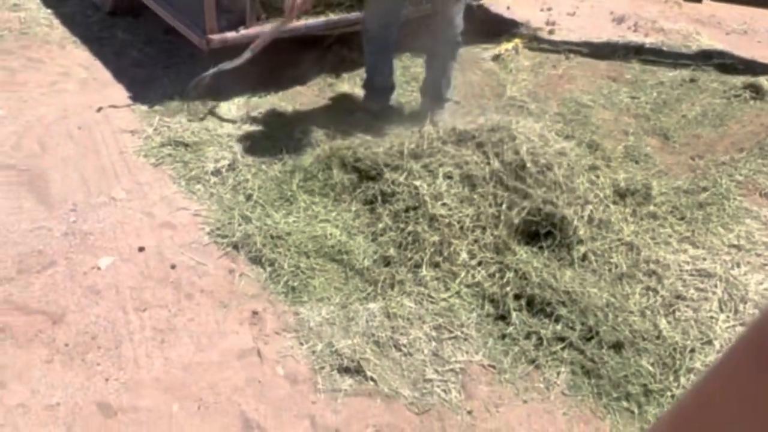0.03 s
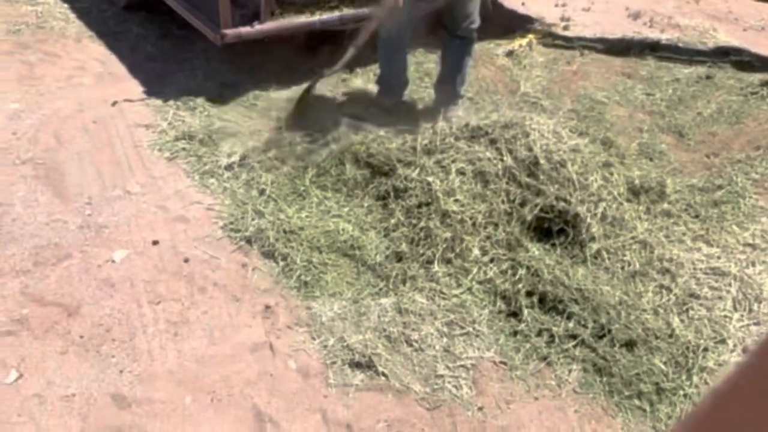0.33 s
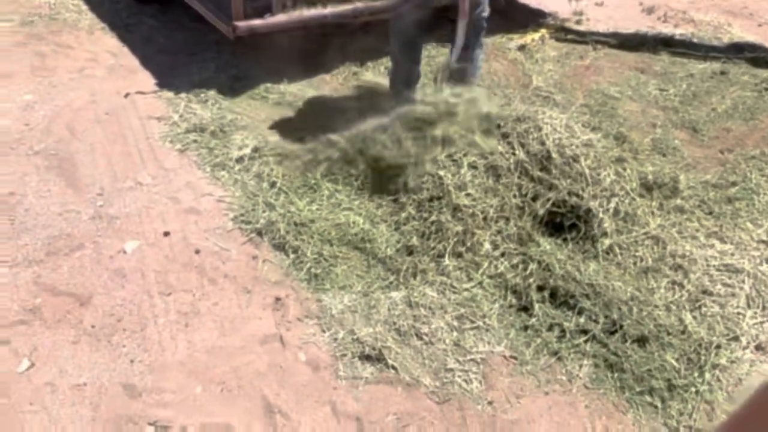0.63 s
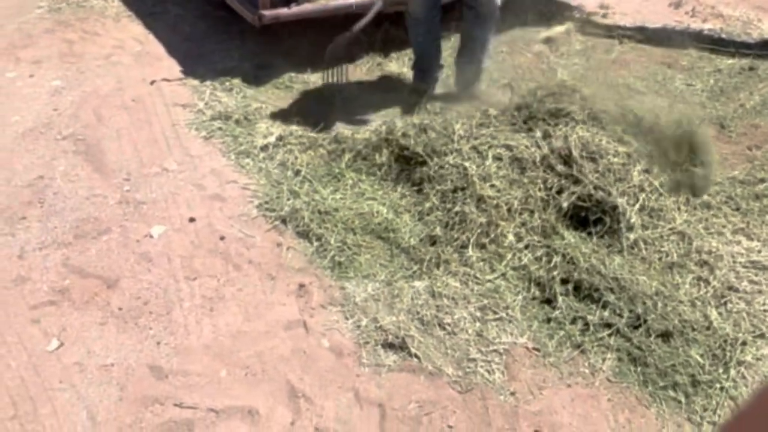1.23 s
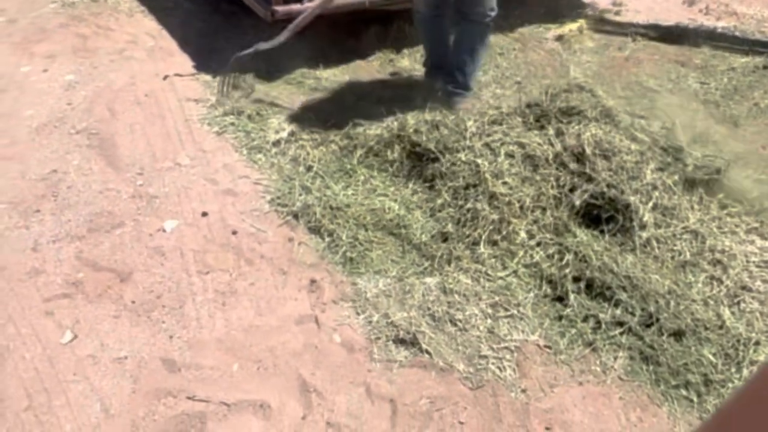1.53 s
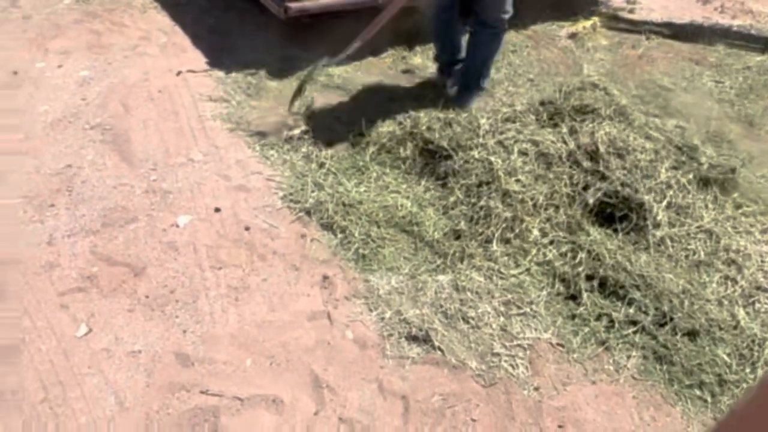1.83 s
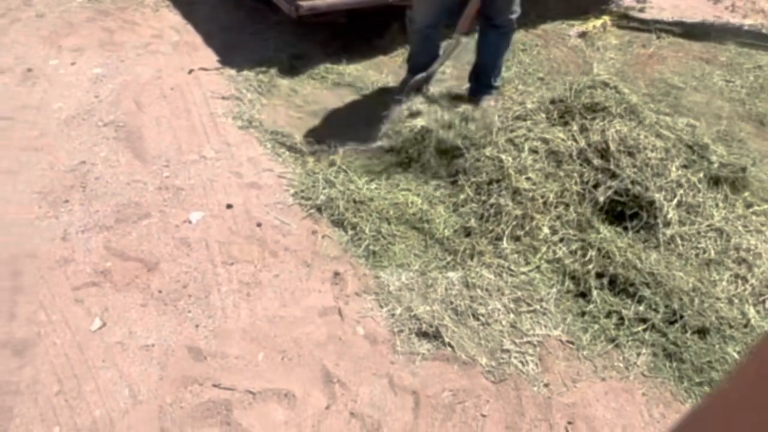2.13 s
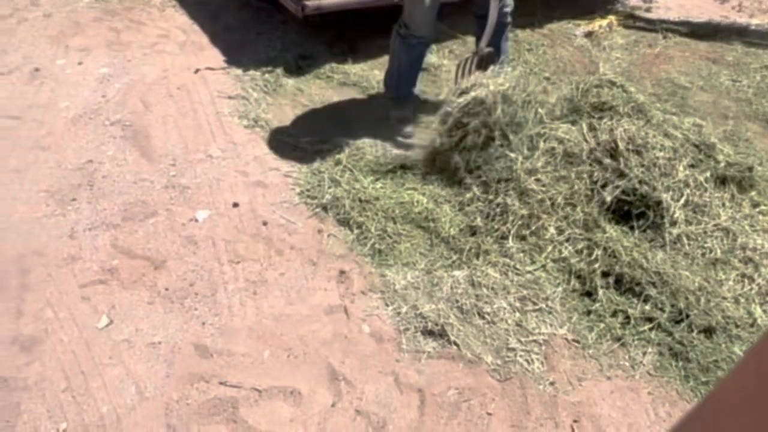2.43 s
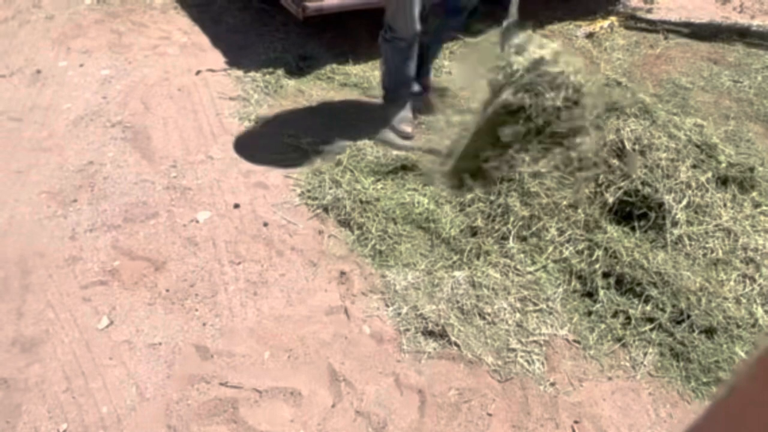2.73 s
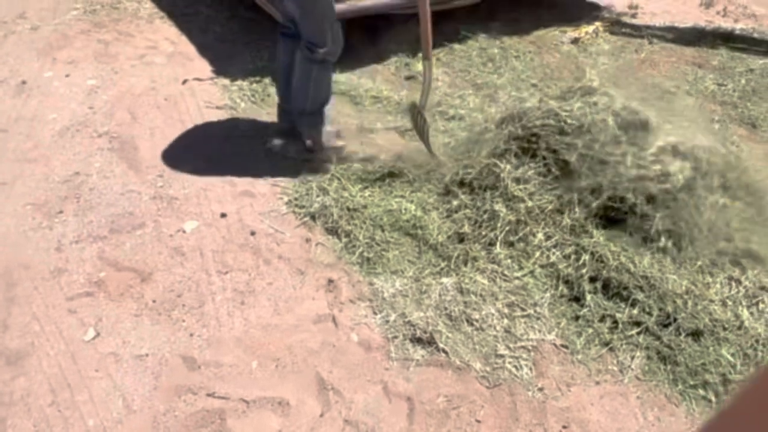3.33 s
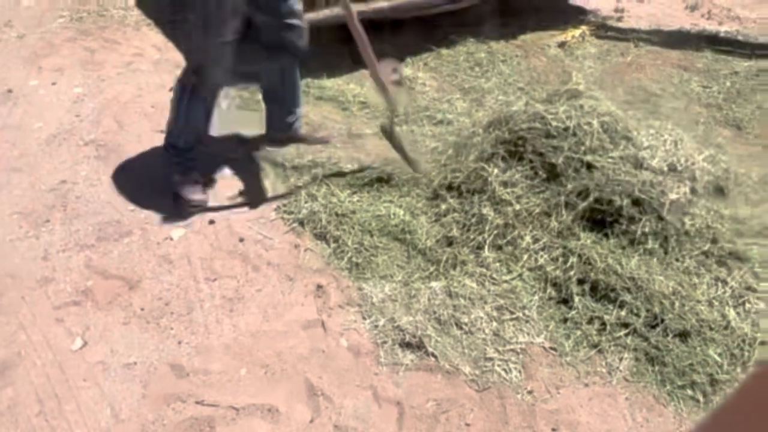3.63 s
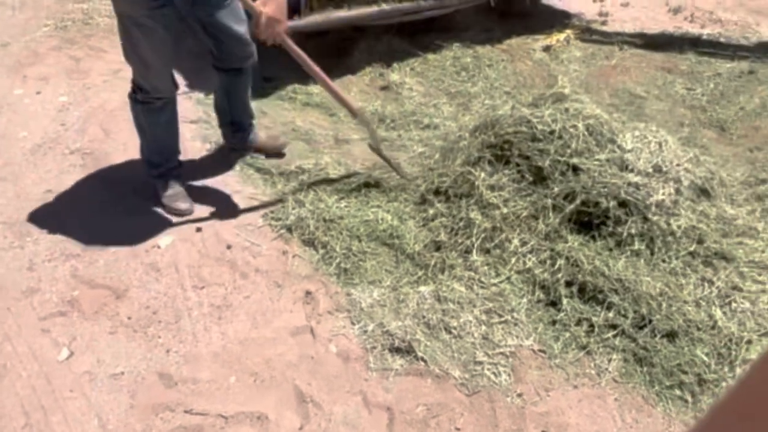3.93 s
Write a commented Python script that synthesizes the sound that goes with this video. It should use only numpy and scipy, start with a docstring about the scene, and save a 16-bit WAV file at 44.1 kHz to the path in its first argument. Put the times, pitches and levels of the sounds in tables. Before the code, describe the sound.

A pitchfork scrapes over hard dirt with ringing clinks at the start, then dry hay rustles as it is lifted and tossed until about 1.2 seconds. The tines grate and clink again from 1.5 to 2.1 seconds. More hay crackles and swishes, landing softly with a clink near 3.2 seconds. Faint boot scuffs, a heel knock and a light scrape follow. Light wind buffets the microphone throughout.

```python
"""Clinks, grating and dry rustle: a pitchfork is pushed twice over hard dirt into loose hay,
and each forkful is lifted and tossed on a pile. Grit cracks under the steel tines and rings them;
countless stalks snap and slide, and the hay lands softly. Boots crush dirt and a heel knocks.
Light wind rumbles and buffets at the two ports of the microphone."""
import sys
import numpy as np
from scipy import signal
from scipy.fft import rfft, irfft
from scipy.io import wavfile

SR = 44100
rng = np.random.default_rng(int(sys.argv[2]) if len(sys.argv) > 2 else 0)


def wrap_up_sound(samples):
    """Save the sound to the file named by the first command line argument, as 16-bit audio."""
    columns = np.atleast_2d(samples).T
    # keep every value between -1 and 1, then stretch to whole-number steps
    tamed = np.clip(columns, -1, 1)
    steps = np.round(tamed * 32767).astype(np.int16)
    wavfile.write(sys.argv[1], SR, steps)


N = 176400
T = np.arange(N) / SR
HZ = np.fft.rfftfreq(2 * N, 1 / SR)
GUST_RATE_HZ, HAY_APART = 22, 0.69
# Steady breeze. Each row: time in seconds, level in dB.
BREEZE_LEVELS = [(.1, -47.5), (.7, -49), (.92, -45), (1.15, -45), (1.25, -56), (1.5, -51.5), (2.25, -54.5),
                 (2.7, -54), (2.85, -48), (3.15, -54), (3.9, -59)]


def amp(db):
    """Decibels to gain."""
    return 10 ** (np.asarray(db) / 20)


def unit(x):
    """Scale to an rms of one."""
    return x / np.sqrt(np.mean(x ** 2) + 1e-20)


def spectrum(points):
    """Interpolate (Hz, value) rows over log frequency."""
    hz, value = np.transpose(points)
    return np.interp(np.log(HZ + 1), np.log(hz), value)


def filtered(x, response):
    """Apply a frequency response."""
    return irfft(rfft(x, 2 * N) * response)[..., :N]


def add(mix, start_s, sound):
    """Mix a sound in at start_s."""
    part = mix[:, max(round(start_s * SR), 0):][:, :sound.shape[1]]
    part += sound[:, :part.shape[1]]


def pair(three, apart):
    """Stereo from one shared signal plus one per side, weighted by apart."""
    return (three[0] + apart * three[1:]) / np.sqrt(1 + apart ** 2)


def wander(rate_hz):
    """Low-passed noise, rms one."""
    return unit(filtered(rng.standard_normal(N), np.exp(-(HZ / rate_hz) ** 2)))


def grains(per_s, spread_db, apart):
    """Stereo train of tiny fractures: many weak, a few strong."""
    strength = amp(spread_db * np.minimum(rng.exponential(1, (3, N)), 5))
    sign = rng.choice([-1., 1.], (3, N))
    fires = rng.random((3, N)) < per_s / SR
    return unit(pair(strength * sign * fires, apart))


def stroke(t, attack_s, hold_s, release_s):
    """Linear rise, hold, exponential fall."""
    return np.clip(t / attack_s, 0, 1) * np.exp(-np.maximum(t - attack_s - hold_s, 0) / release_s)


def scatter(decay_s, size):
    """Spectrum of a short random ring, mean power one."""
    ring = rng.standard_normal(size) * np.exp(-T[:size] / decay_s)
    return rfft(ring / np.linalg.norm(ring))


def yard(x, level_db=-16, t60_s=0.055, taps_per_s=2000):
    """Add brief scatter from the ground and a nearby trailer."""
    t = T[:SR // 3]
    taps = rng.standard_normal((2, len(t))) * (rng.random((2, len(t))) < taps_per_s / SR)
    taps *= amp(-60 * t / t60_s)
    taps /= np.linalg.norm(taps, axis=1, keepdims=True)
    return x + amp(level_db) * signal.fftconvolve(x, taps, axes=1)[:, :N]


def wind(gust_db=1.5, air_db=-64.5):
    """Lumpy rumble on the microphone over quiet open air."""
    # Rumble and air spectra. Each row: frequency in Hz, gain in dB.
    rumble_colour = [(25, -39), (50, 1), (70, 4.5), (110, -4), (170, -23.5), (450, -31), (700, -65),
                     (2000, -39)]
    air_colour = [(280, 8.5), (450, 8.5), (800, -17), (1300, -4), (3000, -7), (8000, -4), (16000, -76)]
    rumble = filtered(pair(rng.standard_normal((3, N)), apart=0.45), amp(spectrum(rumble_colour)))
    rumble = unit(rumble * amp(gust_db * wander(GUST_RATE_HZ)))
    air = unit(filtered(pair(rng.standard_normal((3, N)), apart=0.5), amp(spectrum(air_colour))))
    return rumble * amp(np.interp(T, *np.transpose(BREEZE_LEVELS))) + amp(air_db) * air


def buffets():
    """Eddies hit the ports as ragged pressure pulses, bass last; small puffs follow the breeze."""
    # Eddies. Each row: time in seconds, peak in dB, upper edge in Hz.
    eddies = [(0.106, -39.5, 251), (0.191, -40, 380), (0.34, -27, 230), (0.415, -37.5, 422),
              (0.539, -36.5, 145), (.744, -32, 190), (0.765, -28.5, 195), (0.856, -37, 390),
              (0.882, -29.5, 115), (0.911, -35.5, 254), (1.05, -29, 305), (1.143, -28.5, 142),
              (1.258, -33, 276), (1.318, -34.5, 131), (1.413, -34.5, 298), (1.441, -35, 143),
              (1.61, -40, 334), (1.79, -35, 230), (2.289, -43, 270), (2.359, -39, 260), (2.385, -36.5, 322),
              (2.452, -34.5, 302), (2.552, -40, 400), (2.613, -48, 650), (2.639, -42.5, 460),
              (2.683, -44.5, 217.4), (2.72, -43.5, 460), (2.838, -44.5, 280), (2.92, -45, 300),
              (3.019, -45, 378), (3.971, -27, 210), (3.985, -27.5, 117)]
    puffs_per_s, puff_over_breeze_db, puff_edge_hz = 14, 3.5, 330
    low_cut_hz, slope, delay_cycles, apart_rad, roughness = 44, 0.62, 1.096, 0.63, 0.45
    size = 8192
    hz, out = np.fft.rfftfreq(size, 1 / SR) + 1, np.zeros((2, N))
    puff_s = T[rng.random(N) < puffs_per_s / SR]
    puff_db = np.interp(puff_s, *np.transpose(BREEZE_LEVELS)) + puff_over_breeze_db
    puffs = [(s, db, puff_edge_hz) for s, db in zip(puff_s, puff_db)]
    for start_s, peak_db, edge_hz in eddies + puffs:
        band = hz ** -slope / np.sqrt((1 + (low_cut_hz / hz) ** 8) * (1 + (hz / edge_hz) ** 7))
        phase = rng.uniform(0, 2 * np.pi) + apart_rad * rng.standard_normal((2, 1))
        lag = delay_cycles * rng.uniform(0.6, 1.3) * np.log(hz)  # group delay goes as 1 / hz
        ragged = 1 + roughness * scatter(decay_s=0.006, size=size)
        pulse = irfft(band * np.exp(1j * (phase - 2 * np.pi * lag)) * ragged)
        add(out, start_s, amp(peak_db) * pulse / abs(pulse).max())
    return out


def scuffs():
    """Dirt crushes softly under boots, without ringing."""
    # Steps. Each row: start, attack, hold and release in seconds, level in dB.
    steps = [(.17, 0.047, 0.013, 0.018, -47), (3.248, 0.00086, 0.0025, 0.0097, -47.5),
             (3.32, 0.0022, 0.0029, 0.0085, -52.5), (3.378, 0.0018, 0.0016, 0.0051, -52),
             (3.416, 0.004, 0.0023, 0.0084, -58.5), (3.578, 0.016, 0.012, 0.026, -49.5)]
    # Crunch spectrum. Each row: frequency in Hz, gain in dB.
    dirt_colour = [(100, -11), (380, 4), (660, -5.5), (900, -8), (1250, -7), (2500, -13), (4000, -15),
                   (7000, -10.5), (14000, -31)]
    weight = sum(amp(db) * stroke(T - s, attack, hold, release) for s, attack, hold, release, db in steps)
    dirt = grains(per_s=3000, spread_db=3.5, apart=0.6)
    return weight * unit(filtered(dirt, amp(spectrum(dirt_colour))))


def heel():
    """A boot heel lands and rocks on hard ground with a short hollow ring."""
    # Knocks. Each row: time in seconds, gain in dB.
    knocks = [(3.597, -48), (3.619, -45)]
    # Heel modes. Each row: frequency in Hz, T60 in seconds, relative level in dB.
    modes = [(635, .04, 3), (1164, 0.032, -8)]
    ring = sum(amp(db - 60 * T / t60_s) * np.sin(2 * np.pi * hz * T) for hz, t60_s, db in modes)
    out = np.zeros((2, N))
    for start_s, db in knocks:
        add(out, start_s, amp(db) * ring[None])
    return out


def swishes(relative_width=1.3, flutter_db=2):
    """A forkful sweeps through hay or slides down the pile: crackle in a broad gliding resonance."""
    # Each row: start, attack, hold and release in seconds, level in dB, first and last centre in Hz.
    sweeps = [(.42, .1, 0.12, 0.093, -62, 3260, 2070), (2.27, 0.18, 0.29, 0.044, -58, 5200, 2200),
              (2.83, .14, 0.061, .025, -57.5, 726, 1110), (3.22, 0.012, 0.063, 0.29, -66, 1100, 820)]
    out = np.zeros((2, N))
    for start_s, attack_s, hold_s, release_s, db, from_hz, to_hz in sweeps:
        centre_hz = np.interp(T, [start_s, start_s + attack_s + hold_s], [from_hz, to_hz])
        carrier = np.exp(2j * np.pi * np.cumsum(centre_hz) / SR)
        pole = np.exp(-np.pi * relative_width * min(from_hz, to_hz) / SR)
        straw = grains(per_s=1500, spread_db=4.2, apart=HAY_APART)
        # Shift down, low-pass, shift back: a moving band-pass.
        swish = (carrier * signal.lfilter([1], np.poly([pole, pole]), straw / carrier)).real
        envelope = stroke(T - start_s, attack_s, hold_s, release_s)
        out += unit(swish) * envelope * amp(db + flutter_db * wander(GUST_RATE_HZ))
    return out


def hay():
    """Dry stalks snap and slide: a crisp top over the duller drag of the whole forkful."""
    # Hay motion. Each row: time in seconds, stalk level in dB, dragged mass level in dB.
    motion = [(0, -61, -66.5), (.15, -51, -52), (.42, -52, -56.5), (.66, -47.5, -62), (0.821, -54.5, -68),
              (1.3, -56.5, -109), (1.5, -61, -60.5), (1.95, -55, -65), (2.03, -46.5, -66),
              (2.4, -52, -57.5), (2.65, -49.5, -54.5), (2.9, -55, -61), (3.05, -51.5, -64.5),
              (3.2, -46, -55.5), (3.362, -57, -65), (3.52, -66.5, -76.5), (4, -95, -67)]
    # Stalk and mass spectra. Each row: frequency in Hz, gain in dB.
    stalk_colour = [(1500, -15.5), (4000, -6), (5700, -4), (7000, -1.5), (8300, 2.5), (10000, -4.5),
                    (11500, -0.5), (13500, -7.5), (15200, -5)]
    mass_colour = [(200, 10), (650, -4.5), (1300, 0.5), (2600, -2.5), (4400, 1.5), (6000, -13.5),
                   (10000, -29)]
    times_s, stalk_db, mass_db = np.transpose(motion)
    flutter_db = 0.42 * wander(rate_hz=96)
    out = np.zeros((2, N))
    for colour, level_db in ((stalk_colour, stalk_db), (mass_colour, mass_db)):
        snaps = grains(per_s=9000, spread_db=2.5, apart=HAY_APART)
        crackle = unit(filtered(snaps, amp(spectrum(colour))))
        out += crackle * amp(np.interp(T, times_s, level_db) + flutter_db)
    return out


def fork():
    """Grit cracks under the tines; each contact clangs and rings the steel, brighter on hard hits."""
    # Tines catching on grit. Each row: start, rise and decay in seconds, level before trim in dB,
    # tilt in dB per octave, ring gain in dB, left minus right in dB.
    clinks = [(0.055, 0.001, 0.0029, -42, -4, 3.5, -1), (0.081, 0.0026, 0.0048, -33, 1, -2.5, 0),
              (.182, 0.0012, 0.0085, -41.5, 2, 7, 1), (0.22, 0.0022, 0.003, -30, -3.5, -33, -1),
              (0.293, 0.00067, 0.0072, -33.5, -4.5, -11, -1), (0.33, 0.0037, 0.0095, -35.5, -1, 5.5, 0),
              (.340, 0.0028, 0.0013, -25, 2, -3.5, 7), (1.527, 0.0027, 0.021, -44, -1.5, -1.5, 2),
              (1.738, 0.0021, 0.037, -39, -1.5, -9, 2), (1.766, 0.0057, 0.0045, -35, -2, -9.5, 0),
              (1.813, 0.001, 0.01, -31, 0.5, -5, -2), (1.830, 0.0032, 0.0099, -28.5, 1.5, 5, 1.5),
              (1.938, 0.0007, 0.0029, -28.5, 2.5, -4.5, -0.5), (2.073, 0.0041, 0.0097, -31.5, -2, 2, -2.5),
              (2.116, 0.0033, 0.0078, -36.5, -4.5, -0.5, -1), (3.219, 0.0024, 0.013, -36.5, 0.5, 2, 0),
              (3.73, 0.0045, 0.0068, -52, -4.5, -5, -1), (3.872, 0.0014, 0.0042, -57, -5, -10, -4),
              (3.934, 0.009, 0.007, -42.5, -4, -14, 1)]
    # Tines dragged over dirt. Each row: start, attack, hold and release in seconds, level in dB,
    # tilt in dB per octave.
    drags = [(.008, 0.011, 0.01, 0.014, -56, -7.5), (0.087, 0.0053, .05, 0.018, -48.5, -0.5),
             (0.147, 0.021, 0.06, 0.029, -44, 0.5), (1.601, 0.043, 0.026, 0.046, -44, 0),
             (1.739, 0.017, 0.027, 0.058, -50, -2.5), (1.963, 0.018, 0.1, 0.018, -51.5, -5.5),
             (2.044, 0.04, 0.034, 0.024, -42.5, -2.5), (3.624, 0.013, 0.13, 0.081, -65, -4),
             (3.83, 0.071, 0.05, 0.041, -55.5, -2)]
    # Grit spectrum. Each row: frequency in Hz, gain in dB.
    grit_colour = [(250, 1), (700, -9.5), (1150, -5.5), (2300, 3.5), (3700, -2.5), (5000, 1.5), (8300, 2.5),
                   (11500, -1), (15000, -10.5)]
    # Steel modes. Each row: frequency in Hz, width in Hz, relative gain in dB.
    tines = [(1090, 40, 6), (1322, 20, 14), (1362, 20, 11), (1770, 40, 10), (1890, 30, 6), (2125, 35, 6),
             (2440, 40, 10), (2832, 40, 8), (2982, 30, 7), (3218, 40, 14), (3980, 40, 12), (4366, 60, 12),
             (5690, 40, 6), (6478, 40, 10), (6880, 35, 8), (7265, 45, 7), (7525, 30, 10), (7908, 35, 9),
             (8230, 60, 10), (8634, 28, 14), (9480, 28, 14), (11305, 45, 10), (11555, 32, 19)]
    clink_trim_db, drag_ring_db, slip_db, mode_jitter_db = -2.5, -5, 2.8, 4
    tilt_pivot_hz, choke_pivot_hz, choke_per_octave, hard_hit_db = 5200, 3000, 0.17, -29
    size = 16384
    cracks = grains(per_s=2800, spread_db=3.8, apart=0.63)
    grit = unit(filtered(cracks, amp(spectrum(grit_colour))))
    hz = np.fft.rfftfreq(size, 1 / SR)
    octaves = np.log2(np.maximum(hz / tilt_pivot_hz, 0.25))
    modes = np.array([amp(db) / (1 + 2j * (hz - centre) / width) for centre, width, db in tines])
    # Soft contacts lose their high modes.
    choke = choke_per_octave * np.log2(np.maximum(np.array(tines)[:, 0] / choke_pivot_hz, 1))
    contacts = [(s, rise, 0, decay, db + clink_trim_db, *rest) for s, rise, decay, db, *rest in clinks]
    contacts += [(*row, drag_ring_db, 0) for row in drags]
    slip = amp(slip_db * wander(rate_hz=110))
    out = np.zeros((2, N))
    for start_s, rise_s, hold_s, fall_s, db, tilt, ring_db, pan_db in contacts:
        at = rng.integers(N - size)
        force = stroke(T[:size], rise_s, hold_s, fall_s)
        if hold_s:  # dragged tines stick and slip
            force *= unit(slip[at:at + size])
        scrape = irfft(rfft(grit[:, at:at + size]) * amp(tilt * octaves)) * force
        side_gains = amp([[db + pan_db / 2], [db - pan_db / 2]])
        scrape = unit(scrape) * np.sqrt(np.mean(force ** 2)) * side_gains
        jitter_db = mode_jitter_db * rng.uniform(-1, 1, len(modes))
        steel = amp(ring_db + choke * (db - hard_hit_db) + jitter_db) @ modes
        clang_share = 0.4 if hold_s else 0.8
        clang = np.sqrt(1 - clang_share) + np.sqrt(clang_share) * scatter(decay_s=0.0026, size=size)
        add(out, start_s, irfft(rfft(scrape) * (clang + steel)))
    return out


def scene():
    """Fork, hay and boots in the yard, with wind at the microphone."""
    boots = scuffs() + heel()
    return yard(fork() + boots) + hay() + swishes() + wind() + buffets()


def record(dry):
    """The two ports differ in treble phase and lean the upper middle right; then a low-pass."""
    # Port phase. Each row: frequency in Hz, left lead in radians.
    port_phase = [(250, 0), (550, -.6), (1200, .1), (2200, 0), (3200, 1.5), (4900, 2), (6000, 1.1),
                  (7200, 1.5), (8200, 0), (8900, -.7), (9950, -3.05), (11500, -5.9), (12500, -6.4),
                  (14900, -12.2)]
    # Port balance. Each row: frequency in Hz, left minus right in dB.
    port_balance = [(1300, 0), (2100, -3), (5000, -0.5), (9000, -0.5)]
    edge_hz = 16000
    half = np.array([[0.5], [-0.5]])
    ports = np.exp(1j * spectrum(port_phase) * half) * amp(spectrum(port_balance) * half)
    low_pass = signal.firwin(511, edge_hz, window=("kaiser", 9), fs=SR)
    return signal.oaconvolve(filtered(dry, ports), low_pass[None], "same")


dry = scene()
out = record(dry)
wrap_up_sound(out)
```